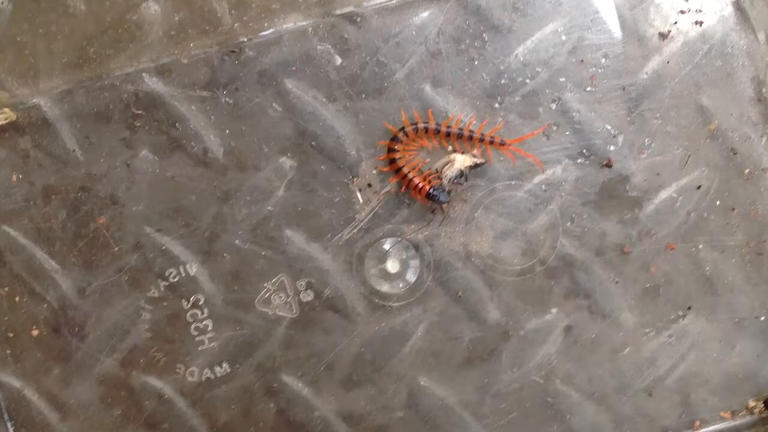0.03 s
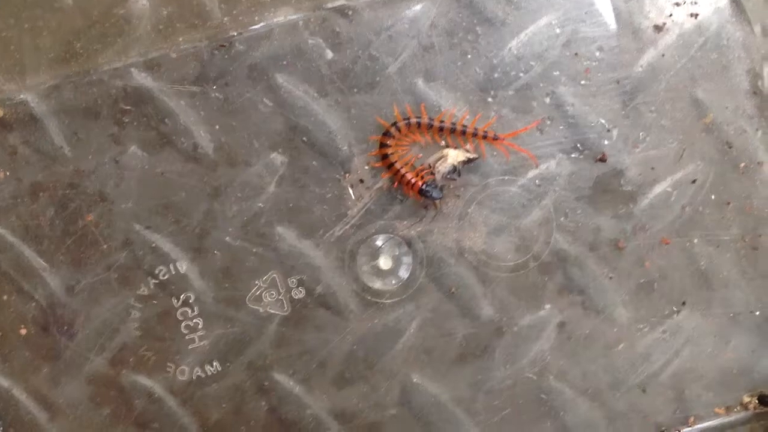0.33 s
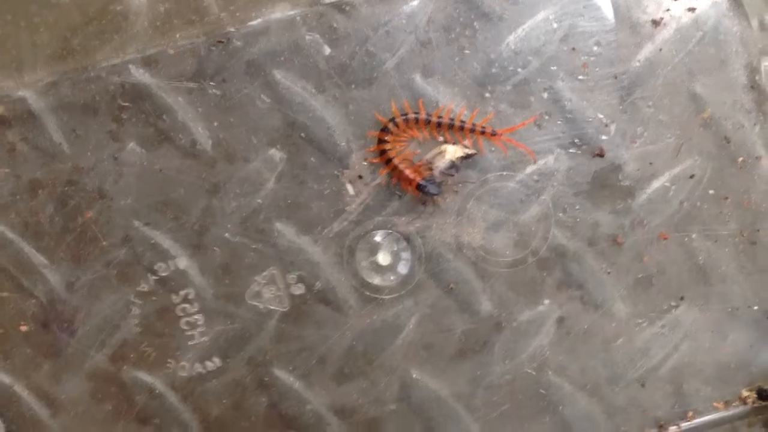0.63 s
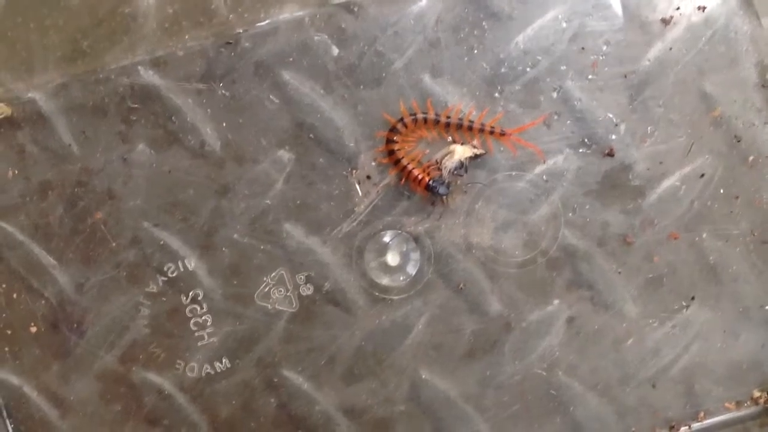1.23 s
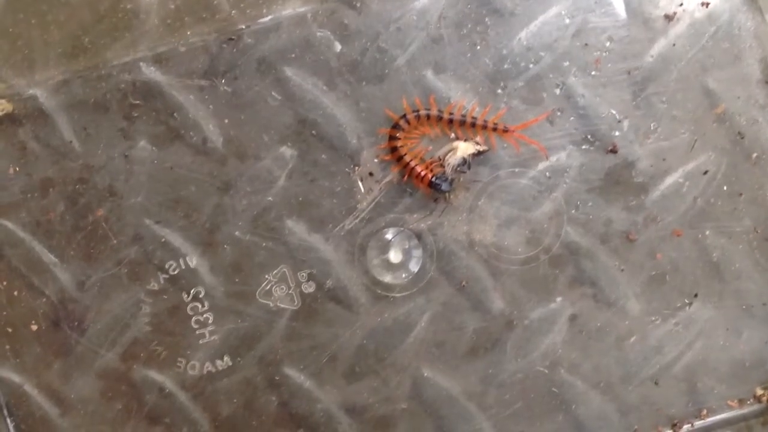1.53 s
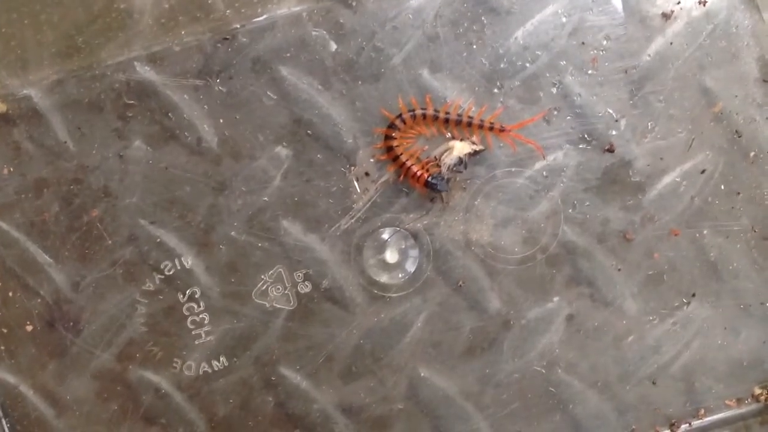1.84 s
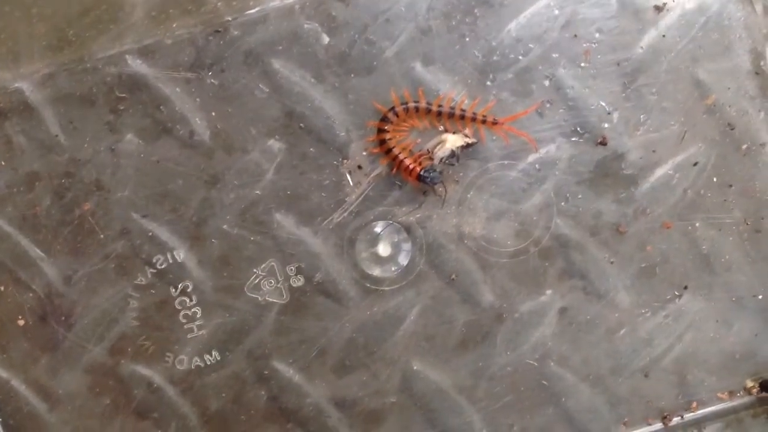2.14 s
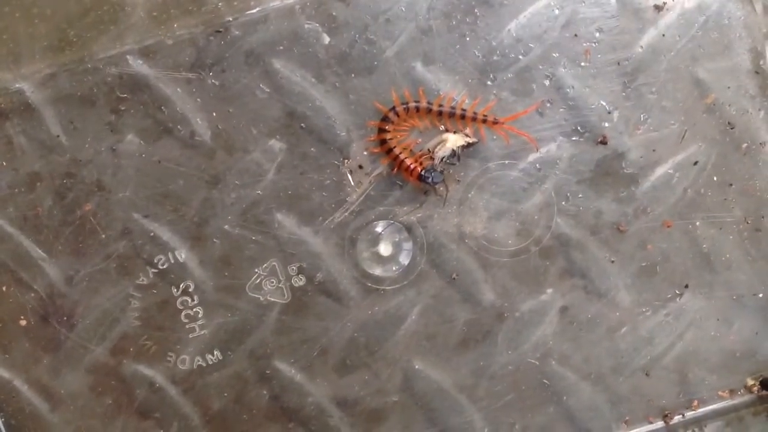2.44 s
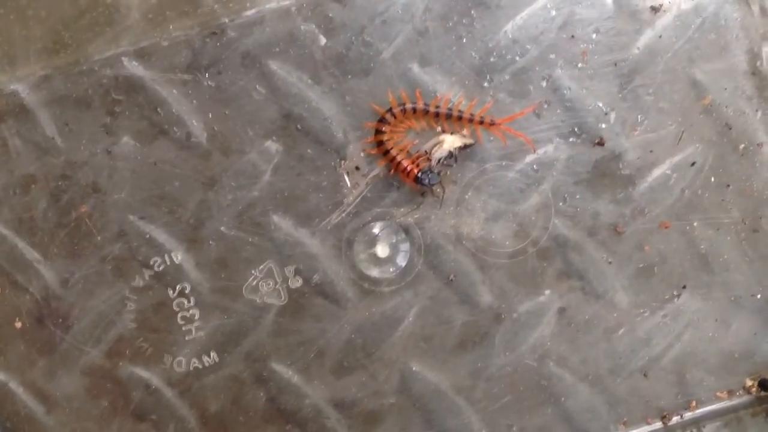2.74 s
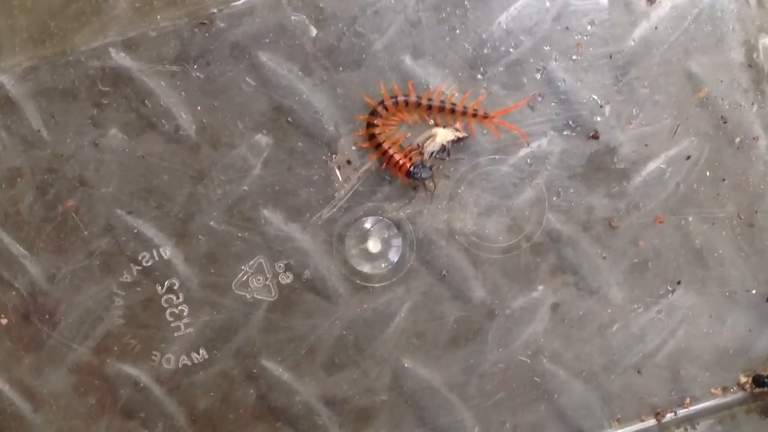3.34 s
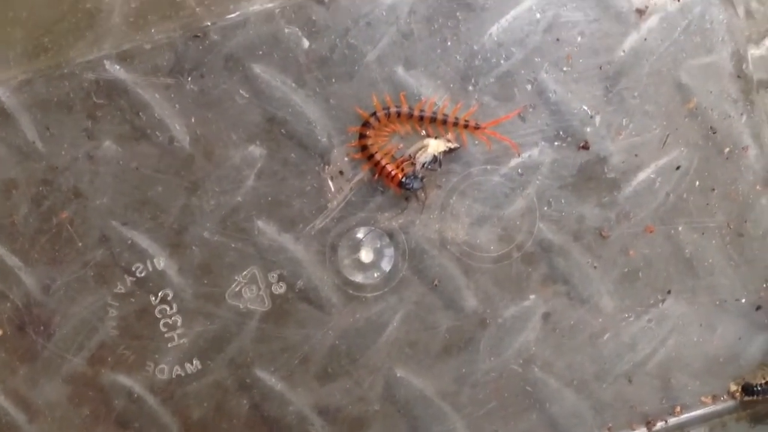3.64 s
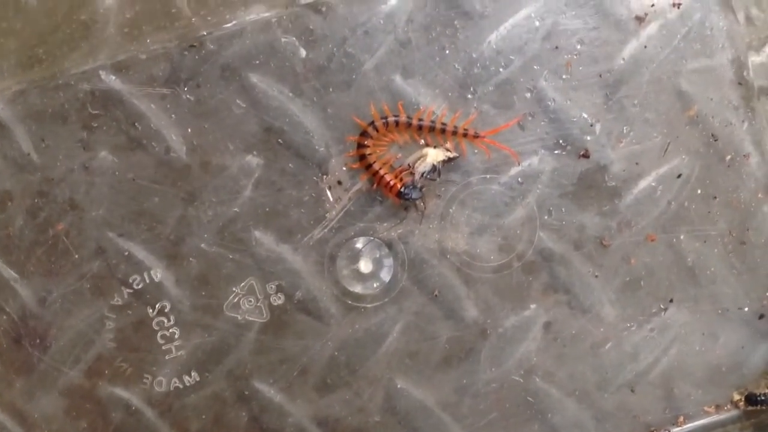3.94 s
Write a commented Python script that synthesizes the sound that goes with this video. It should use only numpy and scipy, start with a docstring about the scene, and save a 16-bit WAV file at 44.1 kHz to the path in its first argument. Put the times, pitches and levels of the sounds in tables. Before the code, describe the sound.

Rain hissing and pattering, heard indoors, with close irregular clicks from a feeding centipede.

```python
"""Centipede feeding during rain

Steady rain, a sum of countless impacts, hisses and drums outside a room. Softer splats of drips come
from further off, and one short ping sounds near the end. Close by, a centipede feeds in a thin plastic
tub: faint crackles and sharp ticks, each tick a damped ring and a crack scattered by the walls.
An automatic gain control ducks at the loudest tick and creeps back."""
import sys
import numpy as np
from scipy import signal
from scipy.fft import rfft, irfft, next_fast_len
from scipy.io import wavfile
from scipy.ndimage import uniform_filter1d, map_coordinates

SR = 44100
rng = np.random.default_rng(int(sys.argv[2]) if len(sys.argv) > 2 else 0)


def inscribe(sig):
    """Save sig as 16-bit PCM at rate SR to the path in sys.argv[1].

    A 1-D sig is mono; a 2-D sig holds one channel per row.
    Samples are clipped to [-1, 1] before scaling.
    """
    pcm = np.round(np.clip(np.atleast_2d(sig).T, -1, 1) * 32767)
    wavfile.write(sys.argv[1], SR, pcm.astype(np.int16))


N = 176400


def amp(db):
    """Amplitude ratio of a level in decibels."""
    return 10 ** (np.asarray(db) / 20)


def unit(x):
    """Normalisation to rms 1."""
    return x / np.sqrt(np.mean(x ** 2) + 1e-20)


def filtered(x, response):
    """Linear filtering: the spectrum of x times a frequency response."""
    size = next_fast_len(len(x) + 8192)
    return irfft(rfft(x, size) * response(np.fft.rfftfreq(size, 1 / SR)), size)[:len(x)]


def coloured(x, points):
    """Spectral shaping by (frequency [Hz], relative level [dB]) points, at rms 1."""
    knots_hz, db = np.transpose(points)
    return unit(filtered(x, lambda hz: amp(np.interp(np.log(hz + 1), np.log(knots_hz), db))))


def noise(points, size=N):
    """Spectrally shaped Gaussian noise of rms 1."""
    return coloured(rng.standard_normal(size), points)


def wobble(rate):
    """Smooth random modulation: a spline through rate knots a second."""
    return map_coordinates(rng.standard_normal(1024), [np.arange(N) * rate / SR + 2], mode="wrap")


def add(track, start_s, sound):
    """Superposition of a sound on the track from start_s on."""
    part = track[round(start_s * SR):][:len(sound)]
    part += sound[:len(part)]


def rain():
    """Incoherent summation: far drops merge into hiss and drumming, nearer ones patter."""
    # strength of the rain (time [s], gain [dB])
    strength = [(.12, 0.9), (.45, 1.5), (.95, 0.44), (1.55, 0.9), (1.75, -0.5), (2.2, -.8), (2.45, -0.1),
                (2.7, -0.84), (3.15, 0), (3.5, -0.1), (4, 1)]
    # spectrum of the hiss and patter (frequency [Hz], relative level [dB])
    hiss_spectrum = [(40, -45), (150, -24), (400, -8.5), (650, -7.5), (730, -4), (900, 2), (1060, 0.4),
                     (1400, -1.1), (2200, -5), (3200, -3.5), (4200, -4.5), (5100, -1), (5600, 1.4),
                     (6050, 2), (7000, -4.2), (8500, -12), (11000, -17), (15000, -23)]
    # dull drumming heard through the room (frequency [Hz], relative level [dB])
    drum_spectrum = [(25, -44), (50, -41), (75, -28.5), (97, -16.5), (112, -15.5), (160, -6), (215, -0.5),
                     (290, -3), (400, -4.5), (520, -9), (640, -20.5), (1000, -26), (3000, -70)]
    # Gaussian swells of the drumming (time [s], gain [dB], half width at 1/e [s])
    swells = [(.7, 1.3, 0.047), (1.1, 2, 0.086), (1.36, 1, 0.096), (2.35, 3.5, .04), (2.83, 3.5, 0.044),
              (3.78, 1, 0.076)]
    hiss_db, drum_db, patter_db, drops_per_s = -32.5, -38, -40.5, 900
    t = np.arange(N) / SR
    strength_db = np.interp(t, *np.transpose(strength))
    swell_db = sum(db * np.exp(-((t - s) / width) ** 2) for s, db, width in swells)
    hiss = amp(hiss_db + 0.46 * wobble(24.93)) * noise(hiss_spectrum)
    drum = amp(drum_db + swell_db + 0.52 * wobble(9)) * noise(drum_spectrum)
    impacts = (rng.random(N) < drops_per_s / SR) * rng.choice([-1, 1], N)
    spread_db = 3 * np.minimum(rng.standard_normal(N), 2)
    patter = amp(patter_db) * coloured(impacts * amp(spread_db), hiss_spectrum)
    return amp(strength_db) * (hiss + drum + patter)


def fizz():
    """Amplitude-modulated noise: the rain's finest treble flickers, strongest in the first second."""
    # contour of the sizzle (time [s], level [dB])
    contour = [(.12, -45), (.4, -40), (.72, -41), (.95, -47), (1.5, -45.5), (1.85, -52), (2.3, -52),
               (3.1, -48), (3.6, -50), (4, -48)]
    # spectrum of the sizzle (frequency [Hz], relative level [dB])
    spectrum = [(3000, -32), (6000, 0), (9000, 1), (12000, -2.5), (15000, -12)]
    level_db = np.interp(np.arange(N) / SR, *np.transpose(contour))
    return amp(level_db + 1.2 * wobble(30.5)) * noise(spectrum)


def splats():
    """Impact excitation: each drip bursts into a rough plink, a hiss and a spray that decay together."""
    # drips (time [s], level [dB], T60 [s], plink frequency [Hz], plink gain [dB], spray gain [dB])
    drips = [(.289, -23.5, 0.14, 4200, -5.5, -3), (.334, -23.5, 0.07, 3400, -10, -7),
             (.542, -27, 0.072, 3340, -2.5, -7), (.675, -23, 0.2, 4300, -16, -2),
             (.765, -29, .06, 3400, -3, -3), (1.091, -25, 0.1, 3480, -1.5, -14),
             (1.168, -26.5, .08, 3600, -0.5, -7), (1.244, -28, .08, 4200, -5, -10),
             (1.502, -33, 0.092, 3220, 1.5, 1.5), (1.592, -29, 0.044, 4000, -1, -1),
             (1.714, -28, .04, 4400, -11, -9), (1.854, -25, 0.027, 3680, 2.5, -3),
             (1.868, -25, 0.06, 4300, -9, -8), (2.356, -30.5, .07, 3700, -2.5, -3),
             (2.386, -21.5, 0.083, 4400, -25, -17), (2.466, -27.5, 0.076, 3200, -9, -6),
             (2.495, -31, 0.054, 3000, -2, -2), (2.797, -28, .1, 3700, -5, -12),
             (2.912, -31, 0.046, 4000, -8, -0.5), (3.024, -30, .07, 3500, -1.5, -5),
             (3.094, -26, 0.053, 4200, -4, -12), (3.149, -26, .06, 4200, -4.5, -9),
             (3.267, -32.5, 0.12, 3030, 1, 1), (3.768, -30, .06, 4000, -7, -4),
             (3.874, -25, 0.17, 3100, -5, -8.5)]
    # broad resonance of the plink (ratio to plink frequency [1], relative level [dB])
    resonance = [(.3, -45), (.72, -16), (.88, -3), (1, -2.5), (1.15, -5), (1.35, -9), (1.7, -22), (3, -45)]
    # hiss of a splat (frequency [Hz], relative level [dB])
    hiss_spectrum = [(2000, -43), (4300, -9.5), (5800, 3), (6700, 0), (8500, -15.5), (14000, -40)]
    # fine spray (frequency [Hz], relative level [dB])
    spray_spectrum = [(4000, -30), (7500, 2), (10900, -0.5), (12200, -8), (15000, -22)]
    attack_s = 0.0012
    out, t = np.zeros(N), np.arange(SR // 5) / SR
    for start_s, db, t60, hz, plink_db, spray_db in drips:
        plink = amp(plink_db) * noise([(hz * ratio, level) for ratio, level in resonance], len(t))
        hiss = noise(hiss_spectrum, len(t))
        spray = amp(spray_db) * noise(spray_spectrum, len(t))
        envelope = (1 - np.exp(-t / attack_s)) * amp(db - 60 * t / t60)
        add(out, start_s, envelope * (plink + hiss + spray))
    return out


def ping():
    """A Gaussian tone pulse: inharmonic partials swell and fade within a few milliseconds."""
    # partials of the ping (frequency [Hz], peak level [dB])
    partials = [(2980, -26.5), (5500, -32), (6690, -25)]
    centre_s, half_width_s = 3.8802, 0.0034
    t = np.arange(N) / SR - centre_s
    envelope = np.exp(-(t / half_width_s) ** 2)
    return envelope * sum(amp(db) * np.sin(2 * np.pi * hz * t) for hz, db in partials)


def crackle():
    """A Poisson process: faint bright specks of noise arrive at random and decay exponentially."""
    # spectrum of the specks (frequency [Hz], relative level [dB])
    spectrum = [(4000, -25), (6000, -1), (9000, -5), (12000, 2), (15000, -2)]
    specks_per_s, level_db, t60 = 26, -52, 0.016
    t = np.arange(SR // 20) / SR
    onsets = rng.random(N) < specks_per_s / SR
    spread_db = 5 * np.minimum(rng.standard_normal(N), 1.5)
    envelope = signal.fftconvolve(onsets * amp(spread_db), amp(-60 * t / t60))[:N]
    return amp(level_db) * unit(envelope * noise(spectrum))


def ticks():
    """Damped vibration: each tick is a brief ring and a bright crack, scattered by the tub's walls."""
    # ticks in the tub (time [s], level [dB], ring frequency [Hz], crack emphasis [dB])
    events = [(0.334, -4.5, 5900, -16), (.4105, -15.5, 6200, 2.5), (.565, -25, 6000, 8),
              (0.655, -10.5, 5800, -8), (.7243, -12, 6010, -4), (0.7703, -10.5, 5200, -7),
              (0.8456, -9, 6030, -8), (0.882, -13, 6160, -5), (.8949, -10, 6100, -7),
              (1.0327, -12.5, 5370, -4), (1.166, -10.5, 6020, -20), (1.3598, -16.5, 6180, -3),
              (1.4147, -12, 5660, -12), (1.453, -16, 5300, -12), (1.4601, -12, 5560, -12),
              (1.4795, -8, 6100, -8), (1.6253, -2, 6100, -8.5), (1.646, -16, 6000, -9),
              (1.6965, -15, 5970, -3), (1.7275, -12.5, 5500, -9), (1.8542, -13.5, 6000, -6),
              (1.935, -18.5, 5650, -11), (1.9887, -13.5, 5550, -9), (2.1093, -18, 5240, -10),
              (2.221, -23, 5390, -4), (2.335, -18.5, 5470, -13), (3.022, -13, 5990, -5),
              (3.0515, -10.5, 5150, -18), (3.267, -13, 5160, 0.5), (3.3576, -28, 6180, 11.5),
              (3.5074, -28, 6420, 10)]
    # spectrum of the crack (frequency [Hz], relative level [dB])
    crack_spectrum = [(500, -45), (2400, -28), (3500, -2), (6000, 9), (9000, -1.5), (11300, 1.5),
                      (15000, -5)]
    # sound scattered in the tub (frequency [Hz], relative level [dB])
    tub_spectrum = [(500, -45), (2700, -32), (4500, -8), (5800, 6.5), (7500, -13), (11000, -10),
                    (15000, -21)]
    ring_db, crack_db, tub_db = 5.5, -3.5, -13
    ring_t60_s, crack_t60_s, tub_t60_s = 0.00186, 0.005, 0.03
    attack_s, tub_attack_s = 0.00008, 0.00074
    out, t = np.zeros(N), np.arange(SR // 12) / SR
    rise = 1 - np.exp(-t / attack_s)
    tub_envelope = (1 - np.exp(-t / tub_attack_s)) * amp(tub_db - 60 * t / tub_t60_s)
    for start_s, db, hz, emphasis_db in events:
        ring = amp(ring_db - 60 * t / ring_t60_s) * np.sin(2 * np.pi * hz * t)
        crack = amp(crack_db + emphasis_db - 60 * t / crack_t60_s) * noise(crack_spectrum, len(t))
        scattered = tub_envelope * noise(tub_spectrum, len(t))
        add(out, start_s, amp(db) * (rise * (ring + crack) + scattered))
    return out


def scene():
    """Superposition of all sources at one microphone, which feeds both channels."""
    return np.tile(rain() + ticks() + crackle() + splats() + ping() + fizz(), (2, 1))


def record(dry):
    """Automatic gain control: a fast duck after a peak and a slow recovery, then a band limit."""
    threshold_db, recovery_db_per_s, attack_s = -15, 2.3, 0.002
    cut_in_s, band_limit_hz = 0.12, 15300
    t = np.arange(N) / SR
    power = np.abs(uniform_filter1d(dry[0] ** 2, size=88))  # 2 ms average
    excess_db = np.maximum(10 * np.log10(power + 1e-12) - threshold_db, 0)
    recovery_db = recovery_db_per_s * t
    duck_db = np.maximum.accumulate(excess_db + recovery_db) - recovery_db
    pole = np.exp(-1 / (attack_s * SR))
    gain = amp(-signal.lfilter([1 - pole], [1, -pole], duck_db)) * (t >= cut_in_s)
    return np.array([filtered(channel * gain, lambda hz: hz < band_limit_hz) for channel in dry])


dry = scene()
out = record(dry)
inscribe(out)
```